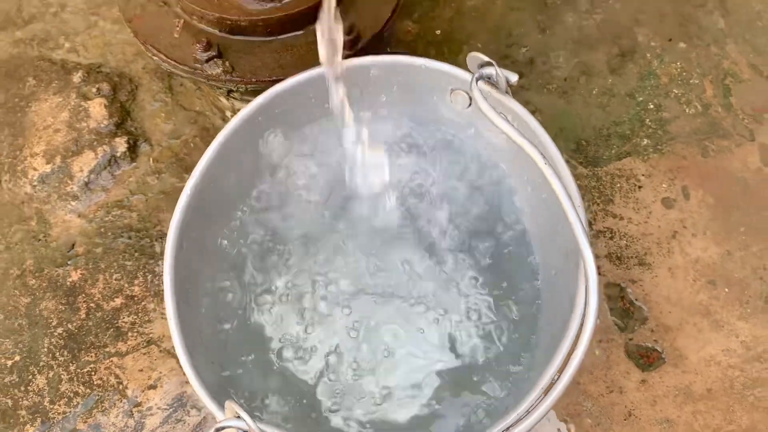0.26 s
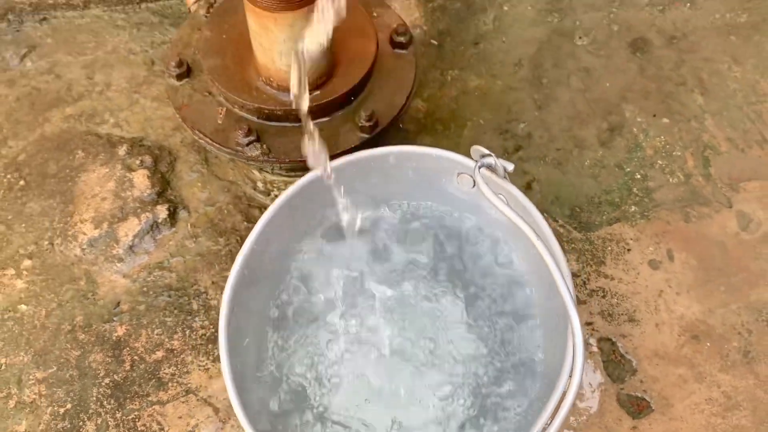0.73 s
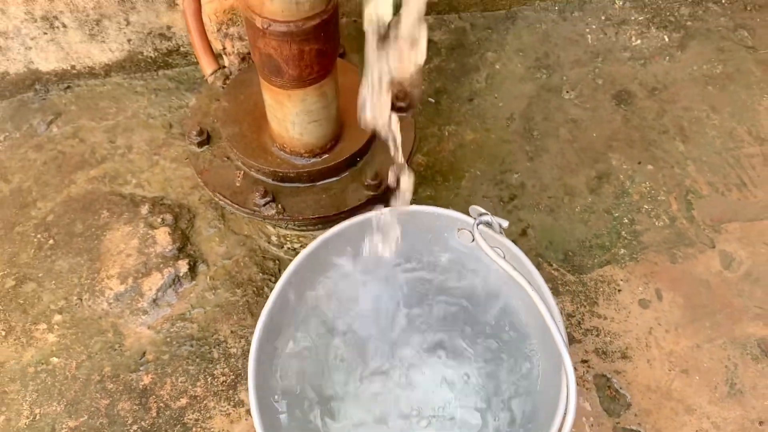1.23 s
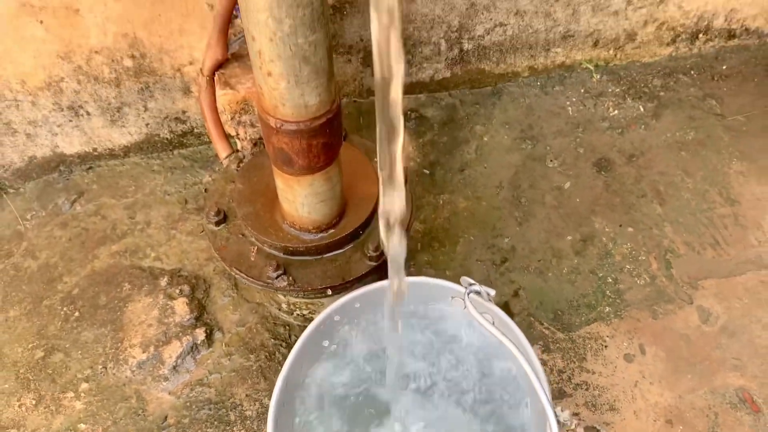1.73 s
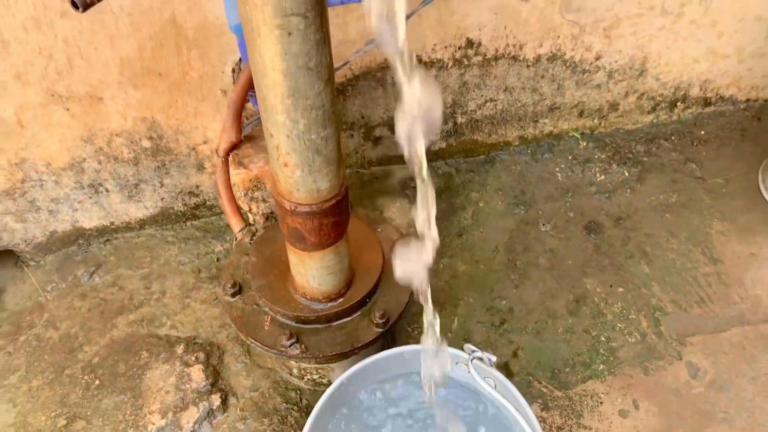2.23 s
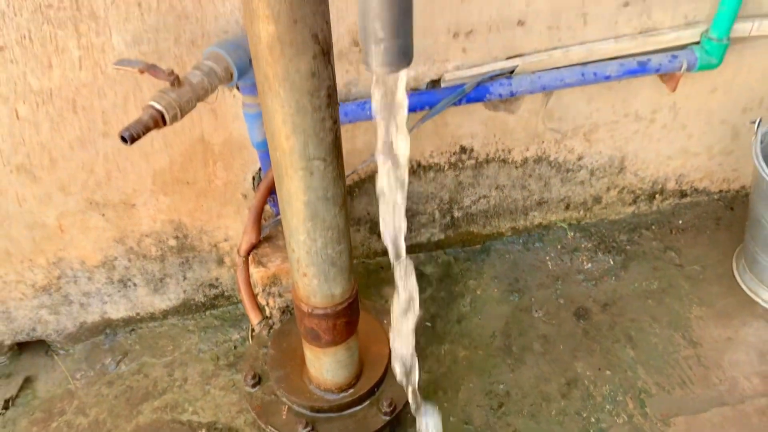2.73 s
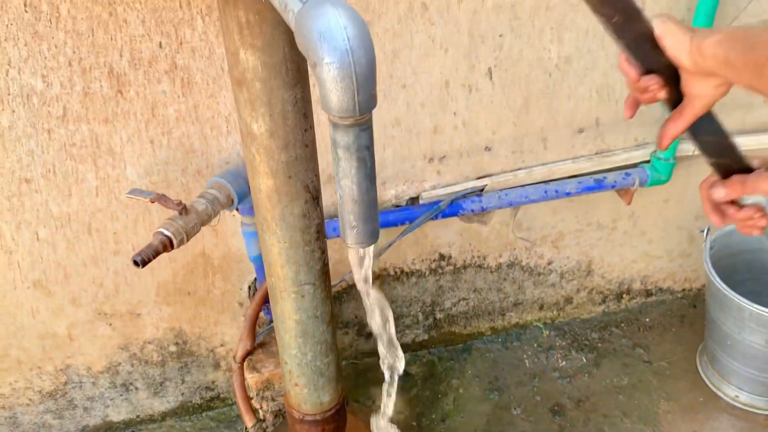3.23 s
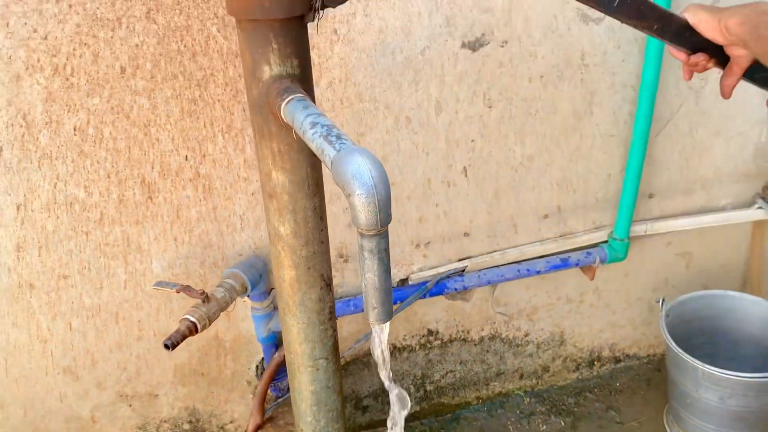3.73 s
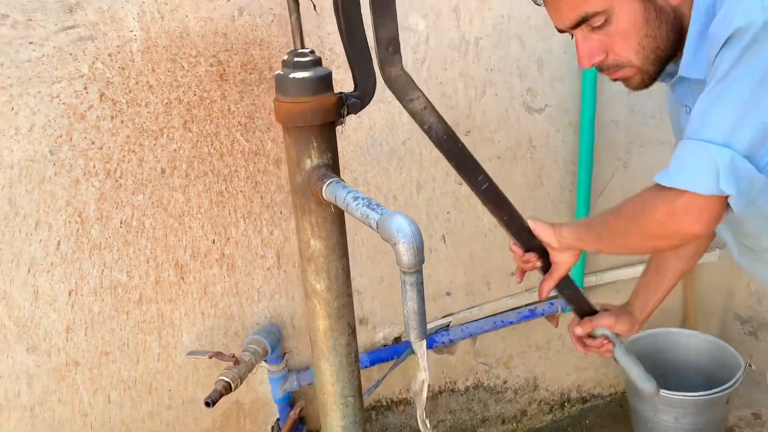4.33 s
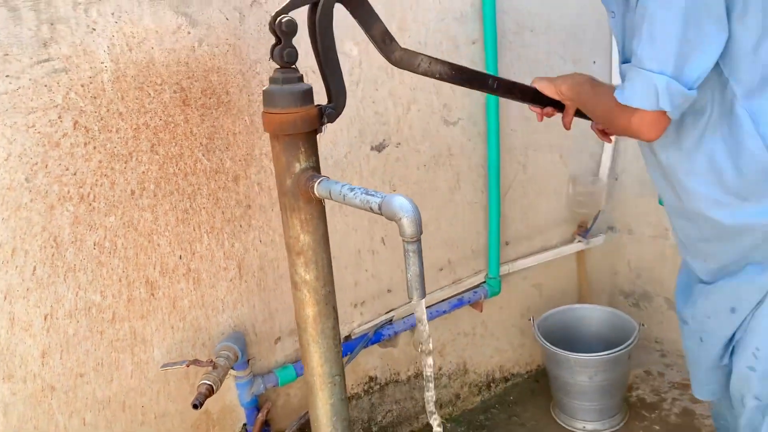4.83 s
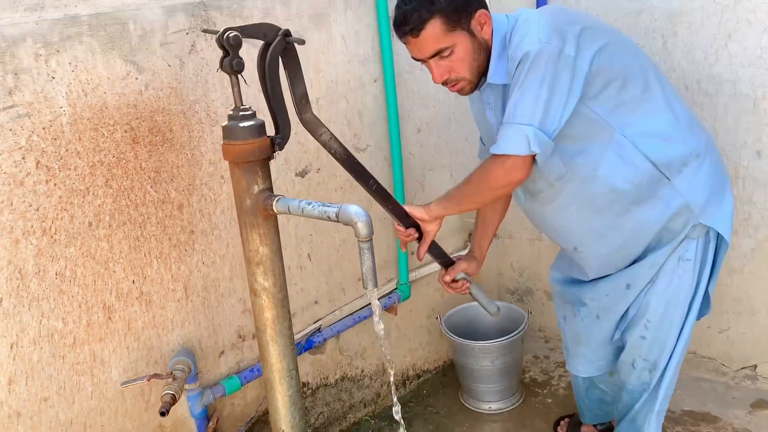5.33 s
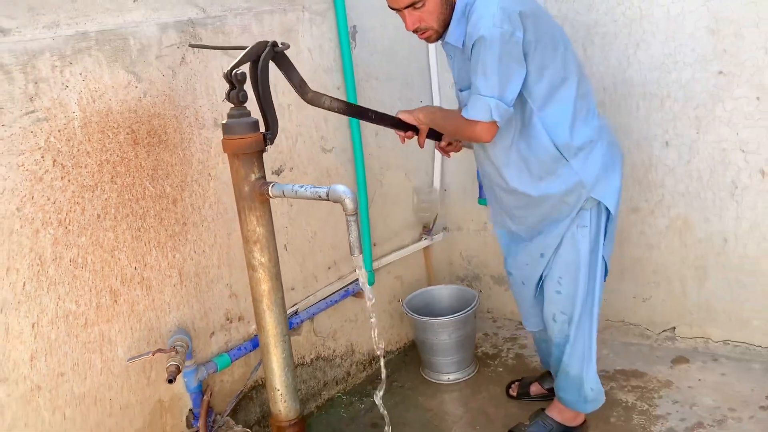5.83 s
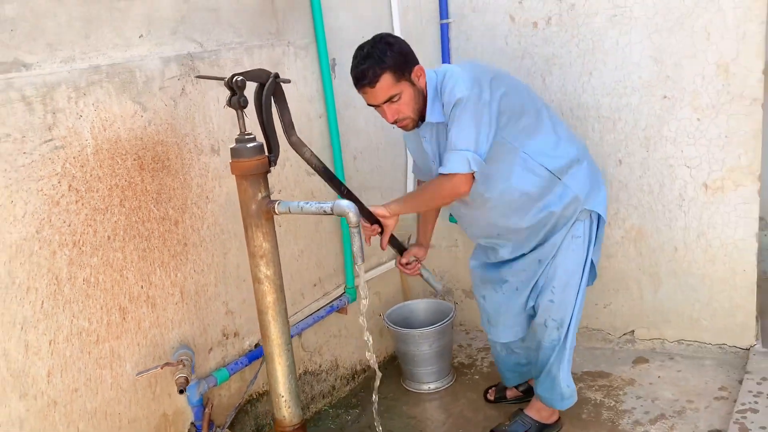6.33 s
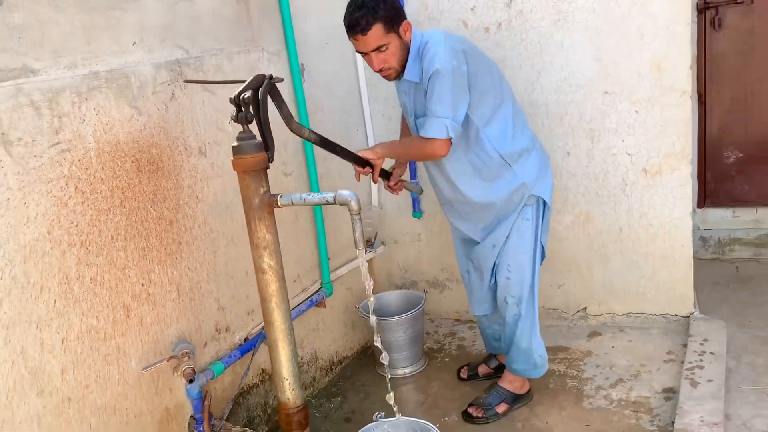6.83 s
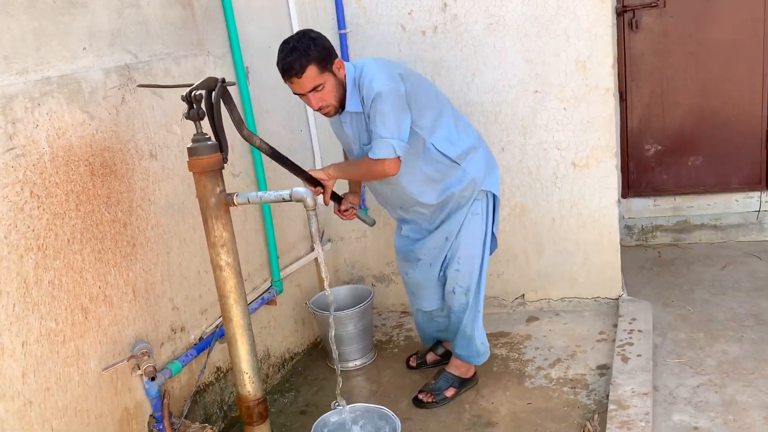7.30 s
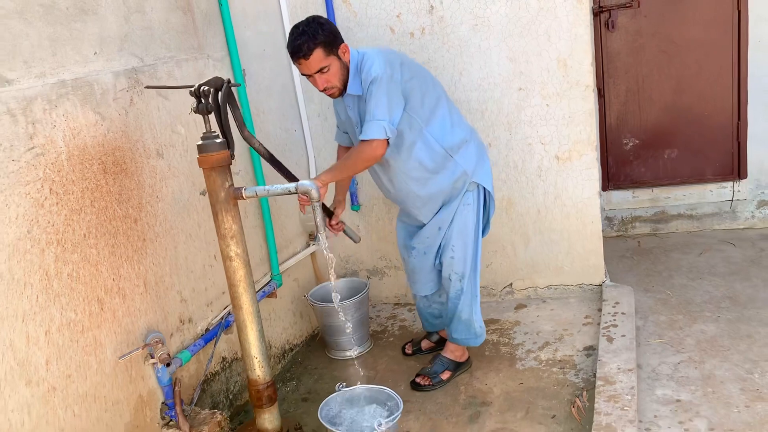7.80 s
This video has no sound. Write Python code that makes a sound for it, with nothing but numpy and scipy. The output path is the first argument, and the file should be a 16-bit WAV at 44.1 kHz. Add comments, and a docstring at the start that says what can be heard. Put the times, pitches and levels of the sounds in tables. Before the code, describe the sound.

Water from a hand pump splashes and gurgles into a part-filled steel bucket, growing more distant, with a few dull thumps.

```python
"""A hand pump pours a lumpy stream of water into a part-filled steel bucket in a walled yard.
The stream slaps the surface, throws spray and drags down air that rings as bubbles, from fine plinks
to deep gulps. The bucket colours the splash and the air inside it hums along. A few dull thumps come
past the middle. The listener slowly backs away, so the pour fades and the echo stands out more."""
import sys
import numpy as np
from scipy import signal
from scipy.fft import rfft, irfft, next_fast_len
from scipy.io import wavfile
from scipy.ndimage import uniform_filter1d

SR = 44100
rng = np.random.default_rng(int(sys.argv[2]) if len(sys.argv) > 2 else 0)


def wav_out(sig):
    """Save sig, one row per channel (or a flat mono array), as 16-bit PCM at SR to the path in sys.argv[1]."""
    wavfile.write(sys.argv[1], SR, np.round(np.clip(np.atleast_2d(sig).T, -1, 1) * 32767).astype(np.int16))


N = 355446
TIME = np.arange(N) / SR
TICKS = np.arange(0, N / SR, .001)   # a coarser clock for slow changes
PLACES_S = (1, 3.3, 6.3)   # when the listener is above the rim, a step back and across the yard

# The yard's echo. Each row: time in seconds, relative level in dB.
ECHO_LEVELS = [(0, -14.5), (3.5, -15), (5.5, -14.5), (8.06, -11)]
# The right channel against the left. Each row: frequency in Hz, phase turn in radians, likeness 0 to 1.
STEREO_BANDS = [(200, .3, 1), (560, .7, .8), (640, 2, .35), (720, 3.1, .8), (1150, 3.1, .98),
                (1750, 3.2, .65), (1930, 2, .4), (2230, 2.1, .8), (2680, 1.7, .2), (3400, 3.5, .88),
                (4200, 3.66, .98)]
# Dull thumps. Each row: start in seconds, relative level in dB, first and last pitch in Hz,
# decay in seconds, level of the knock in dB.
DULL_THUMPS = [(5.427, -19.5, 272, 105, 0.02, -21), (5.477, -12.5, 230, 126, 0.008, -19),
               (5.697, -22, 150, 77, 0.02, -19.5), (5.736, -20.5, 129, 68, .01, -45),
               (6.022, -18, 260, 82, 0.015, -18.5), (6.099, -20.5, 150, 98, 0.023, -30),
               (7.012, -31.5, 120, 75.4, .018, -49), (7.209, -27, 130, 74, .015, -43)]
# The hum of the bucket's air. Each row: time in seconds, relative level in dB.
HUM_LEVELS = [(0.0, -44), (0.3, -39), (0.9, -51), (1.9, -56.5), (2.8, -50), (3.1, -47), (3.5, -47.5),
              (4.1, -42.5), (4.5, -49.5), (4.88, -42.5), (4.95, -31.5), (5.15, -44), (5.6, -42.5),
              (6.7, -46.5), (7.0, -45), (7.3, -41.5), (7.5, -47), (8.06, -47.5)]
# Swells of that hum. Each row: start in seconds, relative level in dB, first pitch in Hz.
HUM_SWELLS = [(0.5, -31, 307.5), (4.125, -33, 293), (4.993, -28, 309), (5.233, -20, 302), (5.681, -43, 296),
              (6.941, -32.5, 294)]
# The bucket's resonances. Each row: pitch in Hz, width in Hz, gain in dB at each of the three places.
BUCKET_RESONANCES = [(560, 30, -4, -22, -27), (765, 90, -22, -9, -16), (860, 70, -9, -14, -4),
                     (1160, 95, 0, -9, -20), (1570, 110, -14, -10, -10), (2225, 80, -14, -3.5, -13)]
# Deep heaving of the water. Each row: time in seconds, relative level in dB.
HEAVE_LEVELS = [(0.0, -47), (0.3, -39.5), (1.5, -37.5), (1.9, -39), (2.05, -45), (2.4, -40), (3.3, -40),
                (3.88, -36.5), (4.03, -45), (4.7, -43.5), (5.35, -36), (6.25, -35), (6.5, -44), (6.72, -37),
                (7.2, -37), (7.38, -44), (7.6, -36), (8.06, -38)]
# Big pockets of air going under. Each row: start in seconds, relative level in dB, pitch in Hz.
AIR_GULPS = [(0.04, -29, 165), (0.166, -15, 300), (0.264, -17.5, 337), (0.649, -25, 168), (0.796, -22, 190),
             (1.352, -21.5, 160), (1.949, -31, 234), (2.204, -24.5, 200), (2.382, -18, 174),
             (2.393, -28, 325), (2.974, -24.5, 195), (3.133, -15, 194), (3.863, -21.5, 114),
             (4.075, -25.5, 159), (4.16, -21, 185), (4.328, -23, 200), (4.7, -24.5, 164), (4.89, -25, 180),
             (7.172, -19.5, 283), (7.437, -23, 180)]
# Tone of the heaving, the three bubble sizes and the spray.
# Each row: frequency in Hz, relative level in dB.
HEAVE_TONE = [(20, -2), (40, -11), (65, 4), (120, -6.5), (185, -5.5), (240, -14), (400, -35), (700, -46)]
LARGE_TONE = [(220, 3.5), (380, 4), (460, 3), (560, -1), (680, 1), (900, -3), (2000, -48)]
MEDIUM_TONE = [(500, -38), (660, -8), (790, 3), (900, 1.5), (1020, 1.5), (1200, 1.5), (1600, -6.5),
               (3500, -24)]
SMALL_TONE = [(800, -18), (1400, -1.5), (1800, -1), (2300, -3), (2900, -4.5), (3800, -1.5), (6000, -21)]
SPRAY_TONE = [(300, -30), (650, -17.5), (1300, -10), (2800, -4.5), (3600, -.5), (4700, -.5), (5800, 2.7),
              (7500, 1), (12000, 0), (15500, -2.5)]
# Glugging cavities. Each row: middle in seconds, half the length in seconds, level in dB,
# pitch in Hz a quarter of the way through, pitch in Hz at three quarters.
CAVITY_GLUGS = [(0.158, 0.019, -22, 665, 482), (0.281, 0.02, -25, 623, 400), (0.432, 0.022, -31, 922, 1980),
                (0.508, 0.027, -33, 734, 510), (0.665, .02, -34, 807, 495), (0.925, .025, -37, 480, 262),
                (1.035, 0.027, -33, 804, 440), (1.775, .016, -26, 1004, 670),
                (2.116, 0.036, -31, 804, 1403), (2.22, .028, -32.5, 886, 1300),
                (2.356, 0.035, -42, 1294, 835), (2.904, 0.019, -26.5, 853, 413),
                (3.097, .03, -29, 701, 1080), (3.404, .014, -35, 796, 514)]
# Loud single bubbles. Each row: time of the peak in seconds, relative level in dB, pitch in Hz,
# rough pulse length in seconds.
LOUD_BUBBLES = [(0.052, -6.5, 1190, 0.0014), (0.087, -10, 860, 0.0038), (0.118, -11.5, 1125, 0.005),
                (0.162, -18, 760, 0.0021), (0.182, -14.5, 1090, 0.0044), (0.229, -15, 1090, 0.0041),
                (0.273, -25, 700, 0.0046), (0.287, -16, 1160, 0.0024), (0.298, -20, 975, 0.0048),
                (0.333, -11.5, 1090, 0.00213), (0.477, -17.5, 1320, 0.0029), (0.607, -20.5, 1140, 0.008),
                (0.636, -25, 1230, 0.0052), (0.682, -19, 1050, 0.0023), (0.7, -14.5, 1130, 0.0058),
                (0.759, -17.5, 1130, 0.0019), (0.788, -14, 1160, 0.0039), (0.816, -16, 1130, 0.0057),
                (0.971, -19, 1280, 0.0069), (0.979, -14, 1160, 0.0027), (1.032, -12.5, 950, 0.002),
                (1.108, -20, 1760, 0.0031), (1.203, -23, 1560, 0.0039), (1.337, -13, 1180, 0.0021),
                (1.351, -16, 920, 0.0053), (1.391, -17, 1130, 0.0022), (1.578, -18, 1810, 0.004),
                (1.672, -17, 1370, 0.0021), (1.773, -22, 970, 0.0033), (2.118, -16.5, 1260, 0.0036),
                (2.167, -23, 1430, 0.0038), (2.226, -26, 1160, 0.0044), (2.275, -10, 2250, 0.0035),
                (2.288, -22, 1550, 0.006), (2.335, -21, 1300, 0.002), (2.351, -28, 1220, 0.0024),
                (2.382, -22, 1680, 0.004), (2.43, -36, 1230, 0.0022), (2.866, -20.5, 1214, 0.0081),
                (2.902, -15.5, 1110, 0.004), (2.947, -19, 1040, 0.0022), (2.978, -34, 1270, 0.0047),
                (3.032, -24, 1600, 0.0046), (3.09, -23, 1060, 0.0021), (3.101, -16, 1080, 0.0023),
                (3.128, -11.5, 1295, 0.0019), (3.139, -17, 1170, 0.0015), (3.726, -12.5, 2160, 0.0018),
                (3.928, -21, 1440, 0.0052), (4.117, -11, 1190, 0.0022), (4.127, -24, 1010, 0.0044),
                (4.412, -12.5, 900, 0.0028), (4.907, -22.5, 2230, 0.009), (4.912, -21, 750, 0.004),
                (4.953, -25, 1550, 0.0024), (5.148, -21, 1756, 0.008), (5.272, -21, 800, 0.0026),
                (5.271, -17, 1604, 0.0049), (5.556, -19.5, 1560, 0.005), (5.804, -24.5, 1654, 0.008)]
# Lumps hitting the water. Each row: start in seconds, relative level in dB,
# seconds for the spatter to fade by 60 dB.
WATER_SLAPS = [(0.067, -8, 0.0096), (0.1676, -12, 0.095), (0.187, -15, 0.019), (.2803, -5.5, 0.034),
               (0.291, -15, .01), (0.3122, -9, 0.014), (0.331, -6, 0.015), (0.334, -10.5, 0.0076),
               (.373, -14.5, 0.014), (0.4318, -13, 0.017), (.478, -9, 0.012), (0.481, -18.5, 0.0088),
               (0.5208, -10, 0.022), (0.5504, -11.5, 0.015), (0.627, -10, 0.036), (0.6428, -9, 0.035),
               (.786, -18, 0.019), (0.9045, -14, .02), (.954, -8.5, 0.044), (1.058, -14, .012),
               (1.071, -7.5, 0.017), (1.204, -14, 0.034), (1.221, -16, 0.066), (1.246, -10.5, 0.025),
               (1.282, -11, 0.021), (1.336, -8.5, 0.018), (1.352, -10.5, 0.018), (1.37, -19, .01),
               (1.382, -13, 0.017), (1.435, -8.5, 0.036), (1.4763, -14, 0.018), (1.5436, -12, 0.027),
               (1.5743, -12.5, 0.028), (1.742, -17, .015), (1.78, -22, 0.033), (1.8226, -13.5, 0.012),
               (1.9994, -22, 0.025), (2.163, -7.5, 0.0063), (2.2317, -13, 0.039), (2.239, -15, 0.021),
               (2.2751, -14.5, 0.065), (2.34, -14.5, 0.093), (2.386, -11, 0.03), (2.421, -15.5, 0.053),
               (2.7019, -13, 0.011), (2.707, -17, 0.075), (2.8045, -17, 0.013), (2.84, -19, 0.013),
               (2.9462, -14, 0.11), (3.1268, -15, 0.013), (3.1353, -17, .008), (3.2917, -9.5, 0.088),
               (3.3595, -15.5, 0.045), (3.445, -11.5, 0.014), (3.47, -15, 0.028), (3.694, -16, 0.01),
               (3.725, -15, 0.013), (3.731, -32, .008), (3.847, -14.5, 0.02), (4.005, -17.5, 0.11),
               (4.328, -24, 0.027), (4.45, -16, 0.035), (4.8103, -23, 0.023), (4.8925, -19, 0.069),
               (4.899, -19.5, .09), (5.031, -21, .012), (5.184, -22, .025), (5.27, -22, 0.031),
               (5.536, -17.5, 0.014), (5.555, -25.5, 0.44), (5.7168, -19, .008), (6.215, -24, 0.19),
               (6.8272, -20, 0.037), (7.481, -19.5, 0.079), (7.495, -18, 0.034), (7.5525, -16.5, 0.023),
               (7.8284, -23.5, 0.12)]
# The fading pour. Each row: time in seconds, relative levels of bubbling and of spray in dB.
POUR_LEVELS = [(0.0, -33.5, -25.5), (0.2, -35, -27.5), (0.45, -36, -26.5), (0.7, -38, -28.5),
               (1.4, -36, -27.5), (1.75, -39, -29), (2.05, -38, -34.5), (2.35, -41, -32.5),
               (2.65, -40.5, -30.5), (3.0, -39, -33), (3.6, -42.5, -35), (4.0, -37.5, -34), (4.6, -41, -35),
               (5.0, -40.5, -36.5), (5.55, -41.5, -38.5), (6.4, -47, -39.5), (7.5, -44.5, -36.5),
               (8.06, -40.5, -32.5)]
# Large, medium and small bubbles. Each row: typical pitch in Hz, offset in dB in the steady pour,
# how strongly they follow its fading, offset in dB in a gurgle.
BUBBLE_SIZES = [(487, -6.5, 1.75, -1.5), (950, -4.5, 1.16, -2.5), (2070, 1.5, 0.45, 0)]
# The stream thins for a moment. Each row: time in seconds, length in seconds, loss in dB.
STREAM_LULLS = [(0.383, 0.24, 4), (1.327, 0.054, 5), (1.52, 0.14, 4), (1.734, 0.026, 8), (1.973, 0.033, 7),
                (2.182, 0.031, 5), (2.54, 0.031, 2.5), (3.268, 0.048, 3), (3.37, 0.018, 11),
                (3.685, 0.029, 3), (3.75, 0.022, 5), (4.255, 0.084, 4.5), (4.87, 0.02, 5),
                (5.05, 0.024, 2.5), (5.123, 0.023, 6), (5.235, 0.044, 3.5), (5.43, 0.024, 1),
                (5.785, 0.04, 1), (5.85, 0.059, 3.5), (6.02, 0.04, 11), (6.39, 0.015, -3),
                (7.376, 0.14, 2.5), (7.923, 0.72, 5.5)]
# Gurgles: a thick lump drags down a cluster of bubbles. Each row: time of the peak in seconds,
# length in seconds, relative level in dB, pitch in Hz.
BUBBLE_CLUSTERS = [(0.012, 0.098, -25.5, 1090), (0.096, 0.053, -26.5, 990), (0.222, 0.032, -29, 990),
                   (0.289, 0.03, -24.5, 680), (0.454, 0.042, -34, 1700), (0.618, 0.043, -32.5, 1310),
                   (0.699, 0.023, -30.5, 810), (0.76, 0.032, -35, 1090), (1.062, 0.025, -31, 643),
                   (1.337, 0.023, -29, 860), (1.617, 0.027, -34, 1390), (1.685, 0.04, -34.5, 1110),
                   (1.775, 0.037, -29.5, 740), (1.919, 0.015, -32.5, 2280), (2.144, 0.023, -31, 845),
                   (2.207, 0.023, -33, 1000), (2.334, 0.056, -29, 1030), (2.39, 0.016, -31, 650),
                   (2.439, 0.02, -28.5, 930), (2.603, 0.23, -41.5, 2200), (2.805, 0.019, -31, 1900),
                   (2.86, 0.011, -35.5, 2300), (2.964, 0.034, -25.5, 1090), (3.118, 0.026, -31, 890),
                   (3.127, 0.019, -35, 900), (3.197, 0.022, -33, 940), (3.31, 0.021, -35, 1700),
                   (3.402, 0.0089, -26, 900), (3.467, 0.033, -30.5, 724), (3.555, 0.018, -34, 835),
                   (3.623, 0.021, -36, 1400), (3.724, 0.036, -38, 1900), (3.995, 0.015, -32, 980),
                   (4.128, 0.072, -34, 790), (4.192, 0.042, -38.5, 1460), (4.715, 0.3, -40, 2070),
                   (4.906, 0.024, -28, 1400), (4.951, 0.031, -32, 1600), (4.994, 0.021, -31.5, 2120),
                   (5.08, 0.027, -31.5, 1630), (5.278, 0.023, -29, 1010), (5.489, 0.015, -29, 1280),
                   (5.542, 0.029, -32.5, 1800), (5.629, 0.053, -36, 2010), (5.813, 0.0097, -37.5, 1900),
                   (5.917, 0.048, -33, 1060), (6.016, 0.069, -37.5, 593), (6.155, 0.016, -32.5, 1170),
                   (6.234, 0.11, -36, 1160), (6.409, 0.012, -34, 2200), (6.57, 0.037, -35.5, 950),
                   (6.668, 0.021, -35.5, 1120), (6.733, 0.03, -38.5, 1170), (6.922, 0.025, -38, 1410),
                   (7.07, 0.075, -35.5, 1370), (7.175, 0.025, -40, 2000), (7.221, 0.053, -38, 1100),
                   (7.287, 0.022, -37, 690), (7.43, 0.032, -38, 1200), (7.483, 0.017, -34.5, 1630),
                   (7.664, 0.055, -35.5, 1270), (7.79, 0.038, -37.5, 1900), (8.03, 0.033, -38, 1040)]


def from_db(db):
    """Turn decibels into a gain."""
    return 10 ** (np.asarray(db) / 20)


def rms_one(x):
    """Scale a signal to an average (rms) level of 1."""
    return x / np.sqrt(np.mean(x ** 2) + 1e-20)


def gain_curve(rows):
    """Join rows of seconds and dB into a gain for every sample."""
    return from_db(np.interp(TIME, *np.transpose(rows)))


def add(out, start_s, sound):
    """Mix a sound in at a given time."""
    i = int(np.clip(round(start_s * SR), 0, N - 1))
    out[i:i + len(sound)] += sound[:N - i]


def coloured(x, tone):
    """Filter a signal by a tone table."""
    size = next_fast_len(len(x) + 2048)
    hz, db = np.transpose(tone)
    bins = np.maximum(np.fft.rfftfreq(size, 1 / SR), 1)
    gain = from_db(np.interp(np.log(bins), np.log(hz), db))
    return irfft(rfft(x, size) * gain, size)[:len(x)]


def evened(x, span_s):
    """Hold the slow level near 1 and keep the fast grain."""
    power = uniform_filter1d(rms_one(x) ** 2, int(span_s * SR))
    return x / np.sqrt(power + 1e-4) / np.std(x)


def resonance(x, hz, width_hz):
    """Let through only a band around one pitch."""
    r = np.exp(-np.pi * width_hz / SR)
    feedback = [1, -2 * r * np.cos(2 * np.pi * hz / SR), r * r]
    return signal.lfilter(np.array([1, 0, -1]) * (1 - r * r) / 2, feedback, x)


def drift(rate_hz):
    """A smooth random wobble, about 1 in size."""
    lowpass = signal.butter(2, rate_hz, fs=1000, output="sos")
    slow = signal.sosfilt(lowpass, rng.standard_normal(len(TICKS) + 500))[500:]
    return np.interp(TIME, TICKS, rms_one(slow))


def surge(peak_s, length_s, linger=1.03):
    """A smooth swell of height 1 that dies a little more slowly than it grows."""
    age = (TICKS - peak_s) / length_s
    return .5 ** (2 * np.where(age < 0, age * linger, age / linger)) ** 2


def impacts(per_s, spread_db):
    """Random clicks, many small and a few large."""
    hits = rng.random(N) < per_s / SR
    return hits * from_db(spread_db * np.minimum(rng.exponential(1, N), 4))


def yard_echo(x, fade_s=0.057):
    """The walls send back a short, dull tail, different on each side, changing as the listener walks."""
    out, age, step = np.zeros((2, N)), TIME[:SR // 6], SR // 4
    crossfade = np.sqrt(np.hanning(2 * step))
    sent = np.pad(gain_curve(ECHO_LEVELS) * x, (0, 2 * step))
    decay = from_db(-60 * age / fade_s) * (age > .003)
    for i in range(0, N, step):
        piece = sent[i:i + 2 * step] * crossfade
        tails = signal.lfilter([1], [1, -.76], rng.standard_normal((2, len(age)))) * decay
        for side, tail in zip(out, tails):
            add(side, i / SR, signal.fftconvolve(piece, tail / np.linalg.norm(tail)))
    return out


def stereo(x, lag_s=10.3 / SR, dip_db=6.5, dip_hz=480):
    """The right channel comes a little later; bubbles ring all over the bucket, so its phase hops."""
    size = next_fast_len(N + 2048)
    hz = np.maximum(np.fft.rfftfreq(size, 1 / SR), 1)
    band_hz, turns, likeness = np.transpose(STEREO_BANDS)
    turn = np.interp(hz, band_hz, turns) - 2 * np.pi * hz * lag_s
    alike = np.interp(hz, band_hz, likeness)
    dip = from_db(-dip_db * np.exp(-(2 * np.log2(hz / dip_hz)) ** 2))
    right = rfft(x, size) * dip * np.exp(1j * turn)
    steady = irfft(right * alike, size)[:N]
    loose = right * np.sqrt(1 - alike ** 2)
    hop_rad = 2.92 * drift(rate_hz=25)
    hopping = np.cos(hop_rad) * irfft(loose, size)[:N] + np.sin(hop_rad) * irfft(1j * loose, size)[:N]
    return np.array([x, steady + hopping])


def thumps(fall_s=0.0051, rise_s=0.0022, knock_s=0.00077, rumble_db=-19):
    """Heavy blows: one short knock, then a quickly dropping note, amid a low rumble."""
    out, age, rumble_power = np.zeros(N), TIME[:SR // 6], 0
    push = (age - rise_s) / knock_s
    knock = push * np.exp((1 - push ** 2) / 2)
    for s, db, first_hz, last_hz, decay_s, knock_db in DULL_THUMPS:
        shape = (1 - np.exp(-age / rise_s)) ** 2 * np.exp(-age / decay_s)
        pitch = last_hz + (first_hz - last_hz) * np.exp(-age / fall_s)
        note = shape / shape.max() * np.sin(2 * np.pi * np.cumsum(pitch) / SR)
        add(out, s, from_db(db + 1.5) * note + from_db(knock_db) * knock)
        rumble_power += from_db(db + rumble_db) ** 2 * surge(s + decay_s, length_s=0.1)
    rumble = resonance(resonance(rng.standard_normal(N), 72, 66), 72, 66)
    return out + np.interp(TIME, TICKS, np.sqrt(rumble_power / 2)) * evened(rumble, span_s=0.061)


def air_hum(hum_hz=296, swell_s=0.011, sag_hz_per_s=130):
    """The air above the water hums at one pitch, with a few brief swells that sag in pitch."""
    hum = resonance(rng.standard_normal(N), hum_hz, width_hz=31)
    hum = evened(resonance(hum, hum_hz, width_hz=190), span_s=0.54)
    out = from_db(-2) * gain_curve(HUM_LEVELS) * hum
    age = TIME[:SR // 5]
    swell = (age / swell_s) ** 2 * np.exp(-age / swell_s)
    for s, db, hz in HUM_SWELLS:
        note = np.sin(2 * np.pi * (hz - sag_hz_per_s * age / 2) * age)
        add(out, s, from_db(db) * swell / swell.max() * note)
    return out


def bucket(x):
    """The steel wall lifts a few narrow bands; which ones carry depends on where the listener stands."""
    return x + sum(np.interp(TIME, PLACES_S, from_db(db)) * resonance(x, hz, width)
                   for hz, width, *db in BUCKET_RESONANCES)


def bubble(hz, cycles, rise, onset_cycles):
    """A trapped bubble rings for some cycles; its pitch climbs as it nears the surface."""
    turns = np.arange(int(cycles / hz * SR) + 2) * hz / SR
    shape = (1 - np.exp(-turns / onset_cycles)) * from_db(-60 * turns / cycles)
    return shape * np.sin(2 * np.pi * turns * (1 + rise * turns / cycles / 2))


def bubble_cloud(count, low_hz, high_hz, cycles, rise, spread_db):
    """Bubbles of random size, strength and life, born at random times."""
    out = np.zeros(N)
    for when, size, strength, life, glide in rng.random((count, 5)):
        hz = low_hz * (high_hz / low_hz) ** size
        # fine bubbles are made stronger than big ones
        gain = hz / low_hz * from_db(spread_db * min(-np.log(1 - strength), 3.5))
        ring = bubble(hz, cycles * (.5 + life), 2 * rise * glide, onset_cycles=cycles / 12)
        add(out, when * N / SR, gain * np.sign(glide - .5) * ring)
    return out


def churning(side_db=-13):
    """The plunging jet heaves the water and now and then traps a big pocket of air."""
    cloud = bubble_cloud(3200, low_hz=30.7, high_hz=435, cycles=6.2, rise=0.39, spread_db=3.5)
    heave = evened(coloured(cloud, HEAVE_TONE), span_s=0.13)
    side = from_db(side_db) * rms_one(coloured(rng.standard_normal(N), HEAVE_TONE))
    gulps = np.zeros(N)
    for s, db, hz in AIR_GULPS:
        add(gulps, s, from_db(db - 4) * bubble(hz, cycles=25.7, rise=0.048, onset_cycles=0.6))
    return from_db(1) * gain_curve(HEAVE_LEVELS) * np.array([heave + side, heave - side]) + gulps


def glugs(shudder_depth=0.54, shudder_hz=130):
    """A cavity's note falls as it widens or rises as it closes, and shudders as the water moves."""
    out = np.zeros(N)
    lowpass = signal.butter(2, shudder_hz, fs=SR, output="sos")
    shudder = 1 + shudder_depth * rms_one(signal.sosfilt(lowpass, rng.standard_normal(N)))
    for s, half_s, db, early_hz, late_hz in CAVITY_GLUGS:
        shape = np.hanning(int(2 * half_s * SR))
        pitch = early_hz * (late_hz / early_hz) ** np.linspace(-.5, 1.5, len(shape))
        add(out, s - half_s, from_db(db) * shape * np.sin(2 * np.pi * np.cumsum(pitch) / SR))
    return out * shudder


def plop(hz, length_s, rise, ring_db=-11, ring_s=0.0085):
    """A bubble breaks off with a short round pulse and rings on more softly, rising in pitch."""
    age = TIME[:SR // 16]
    swell = age / (.7 * length_s)
    pulse = (swell * np.exp(1 - swell)) ** 3
    shape = pulse + from_db(ring_db) * np.exp(-age / ring_s) * (1 - np.exp(-swell ** 2))
    pitch = hz * (1 + rise * np.tanh((age - length_s) / (2 * ring_s)))
    return shape / shape.max() * np.sin(2 * np.pi * np.cumsum(pitch) / SR)


def plops(scatter_s=0.013):
    """Each loud bubble is followed by two weaker ones of nearby sizes."""
    out = np.zeros(N)
    for s, db, hz, length in LOUD_BUBBLES:
        add(out, s - 0.711 * length, from_db(db - 3) * plop(hz, length, rise=0.134))
        for delay, size in rng.random((2, 2)):
            nearby_hz = hz * 2 ** (1.48 * (size - .5))
            add(out, s + scatter_s * delay, from_db(db - 13) * plop(nearby_hz, length, rise=0.24))
    return out


def droplets(per_s, spread_db, hiss):
    """Fine drops tick over the hiss of the finest."""
    ticks = rms_one(impacts(per_s, spread_db) * rng.choice([-1, 1], N))
    return rms_one(ticks + hiss * rng.standard_normal(N))


def slaps(rise_s=0.0004, crack_s=0.00069, spatter_db=-11):
    """A big lump of water lands with a crack and a short spatter, each slap with its own tone."""
    out, age = np.zeros(N), TIME[:N // len(WATER_SLAPS)]
    grain = rms_one(coloured(droplets(per_s=8300, spread_db=5.5, hiss=0.28), SPRAY_TONE))
    for k, (s, db, fade_s) in enumerate(WATER_SLAPS):
        spatter = from_db(spatter_db - 60 * age / fade_s)
        shape = (np.exp(-age / crack_s) + spatter) * (1 - np.exp(-age / rise_s))
        burst = grain[k * len(age):(k + 1) * len(age)] * shape
        sizzle = 0.5 * resonance(burst, rng.uniform(5000, 10000), width_hz=1100)
        body = from_db(-4) * resonance(burst, rng.uniform(1200, 2700), width_hz=280)
        gain = from_db(db) * np.sqrt(np.mean(shape ** 2)) / shape.max()
        add(out, s, gain * rms_one(burst + sizzle + body))
    return out


def lumpiness(per_s, spread_db, rise_s, decay_s, steady):
    """Water arrives in lumps on top of a steady flow: each surges quickly and dies away."""
    poles = np.exp(-1 / (np.array([rise_s, decay_s]) * SR))
    return rms_one(signal.lfilter([1], np.poly(poles), impacts(per_s, spread_db) + 1e-18)) + steady


def spray(lumps, level):
    """Every lump throws droplets; each drop size also has its own flurries, less distinct from afar."""
    shower, edges_hz = np.zeros(N), [300, 3200, 5500, 7000, 9000, 12000, 17000]
    lump_share = np.interp(TIME, PLACES_S[::2], [0.82, 0.98])
    flurry_share = np.interp(TIME, PLACES_S, [1.0, 0.7, 0.5])
    for band in zip(edges_hz, edges_hz[1:]):
        flurries = lumpiness(per_s=130, spread_db=5.5, rise_s=0.0019, decay_s=0.0019, steady=0.045)
        fineness = np.clip(band[0] / 7000, 0.35, 1)   # the lower bands run together into a wash
        patter = 1 + lump_share * (lumps - 1) + flurry_share * fineness * flurries
        drops = droplets(per_s=9000, spread_db=5.0, hiss=0.9) * rms_one(patter)
        flicker = from_db(2.7 * drift(rate_hz=23))
        shower += signal.sosfilt(signal.butter(2, band, "band", fs=SR, output="sos"), drops * flicker)
    return from_db(-0.5) * level * evened(coloured(shower, SPRAY_TONE), span_s=0.18)


def froth(cloud, lumps, tone, rush):
    """A cloud of bubbles blends into the rush of the jet; both surge with the lumps."""
    bubbles = rms_one(coloured(cloud * np.sqrt(lumps), tone))
    jet = rms_one(coloured(rng.standard_normal(N) * lumps, tone))
    return evened(bubbles + rush * jet, span_s=0.089)


def bubbling(lumps, large_gain, medium_gain, small_gain):
    """Air dragged under by the stream rings as bubbles of three sizes."""
    large = bubble_cloud(1200, low_hz=296.2, high_hz=866, cycles=26, rise=0.432, spread_db=2.5)
    medium = bubble_cloud(3800, low_hz=591, high_hz=1603, cycles=38, rise=0.19, spread_db=2.5)
    small = bubble_cloud(14000, low_hz=1228, high_hz=4270, cycles=55.3, rise=0.208, spread_db=2)
    blur = np.interp(TIME, PLACES_S, [0.5, 1.1, 2.1])   # from afar single bubbles merge into the rush
    return (from_db(-2) * large_gain * froth(large, lumps, LARGE_TONE, rush=0.38 * blur)
            + medium_gain * froth(medium, lumps, MEDIUM_TONE, rush=0.46 * blur)
            + from_db(1.5) * small_gain * froth(small, lumps, SMALL_TONE, rush=0.33 * blur))


def pour_gains(base_db=-46, cluster_octaves=0.6, cluster_spray_db=-3.5):
    """The stream thins and gurgles, setting the gains of the three bubble sizes and of the spray."""
    times, *levels = np.transpose(POUR_LEVELS)
    bubbling_db, spray_db = (np.interp(TICKS, times, level) for level in levels)
    lull_db = sum(loss_db * surge(s, length) for s, length, loss_db in STREAM_LULLS)
    size_hz, size_db, fading, gurgle_db = np.transpose(BUBBLE_SIZES)[:, :, None]
    bubble_power = from_db(base_db + size_db + fading * (bubbling_db - base_db) - lull_db) ** 2
    spray_power = from_db(spray_db - lull_db) ** 2
    for s, length, db, hz in BUBBLE_CLUSTERS:
        share = np.exp(-(np.log2(size_hz / hz) / cluster_octaves) ** 2 / 2)   # nearest size gets most
        cluster = from_db(db) ** 2 * surge(s, length)
        bubble_power += share / share.sum() * from_db(gurgle_db) ** 2 * cluster
        spray_power += from_db(cluster_spray_db) ** 2 * cluster
    return [np.interp(TIME, TICKS, np.sqrt(power)) for power in (*bubble_power, spray_power)]


def scene():
    """Mix the pouring water, the bucket's hum and the thumps, and add the yard's echo."""
    *bubble_gains, spray_gain = pour_gains()
    lumps = lumpiness(per_s=95, spread_db=1.5, rise_s=0.00058, decay_s=0.0054, steady=0.96)
    splash = bubbling(lumps, *bubble_gains) + spray(lumps, spray_gain) + slaps()
    water = bucket(splash) + plops() + glugs()
    knocks, hum = thumps(), air_hum()
    lean_left = from_db([[3.3], [-3.3]])
    direct = stereo(water) + knocks + hum * lean_left + churning()
    return direct + yard_echo(water + hum + 0.82 * knocks)


def record(dry):
    """Round off the sharpest peaks and cut the highest treble steeply."""
    lowpass = signal.ellip(10, .2, 70, 15800, fs=SR, output="sos")
    return signal.sosfilt(lowpass, .8 * np.tanh(dry / .8))


dry = scene()
out = record(dry)
wav_out(out)
```